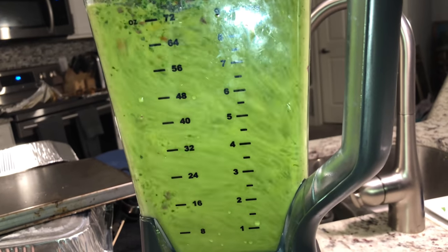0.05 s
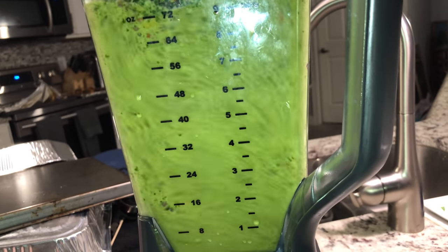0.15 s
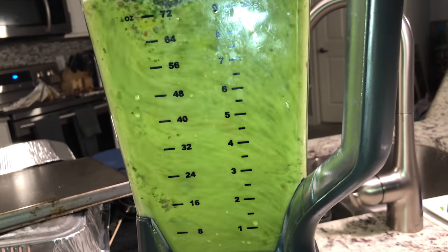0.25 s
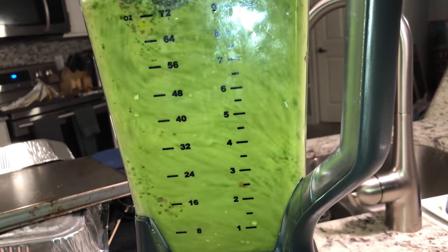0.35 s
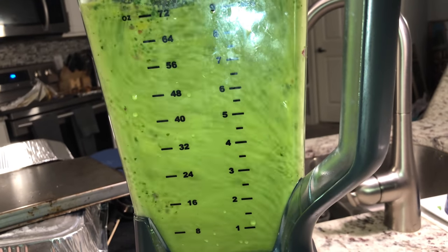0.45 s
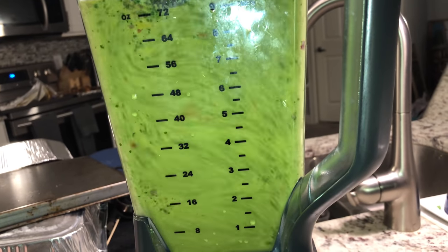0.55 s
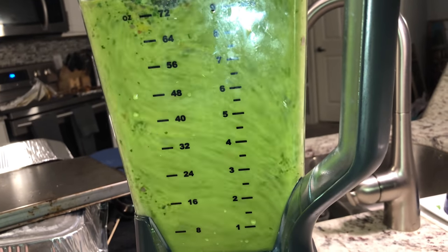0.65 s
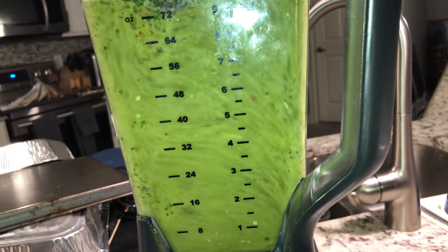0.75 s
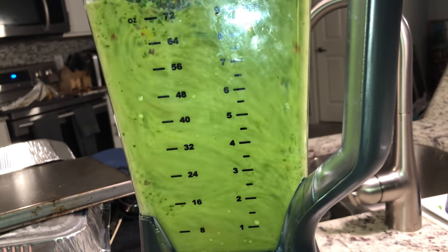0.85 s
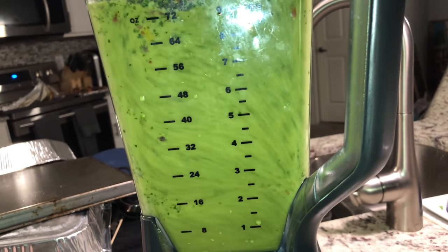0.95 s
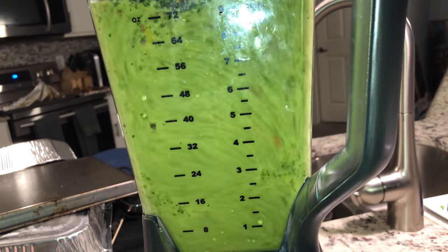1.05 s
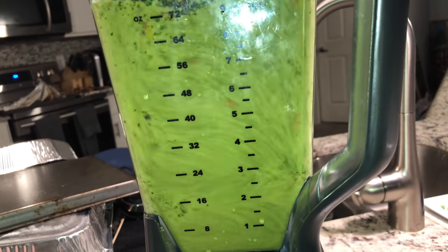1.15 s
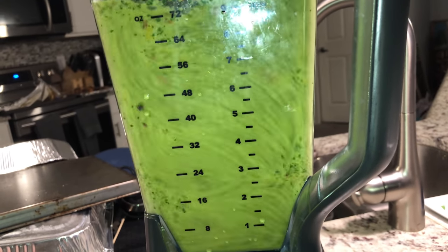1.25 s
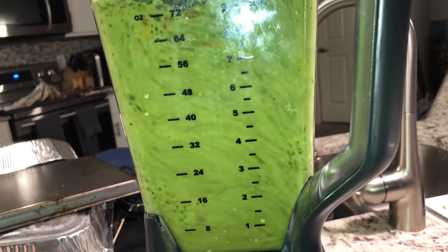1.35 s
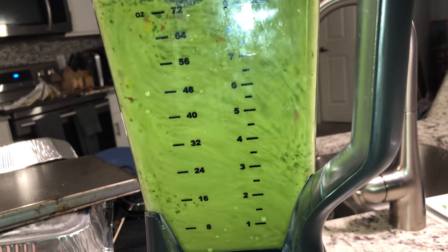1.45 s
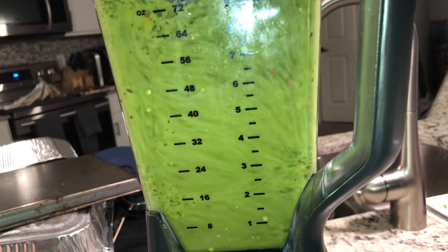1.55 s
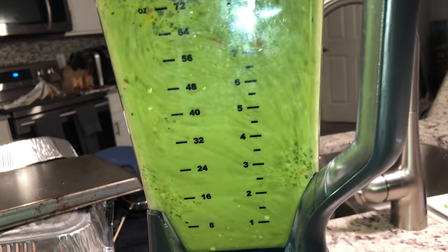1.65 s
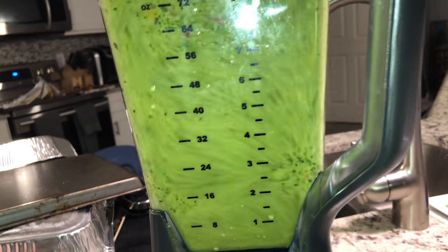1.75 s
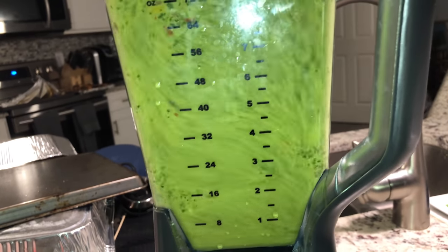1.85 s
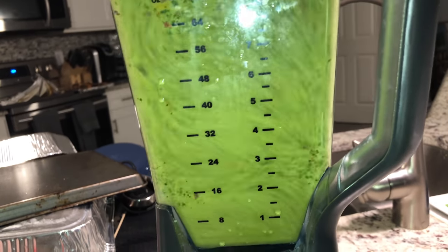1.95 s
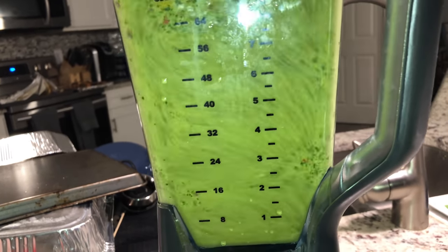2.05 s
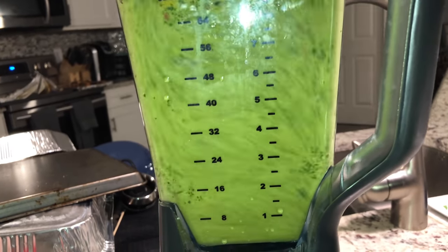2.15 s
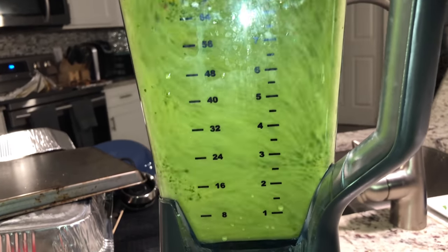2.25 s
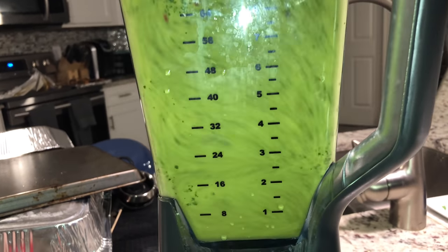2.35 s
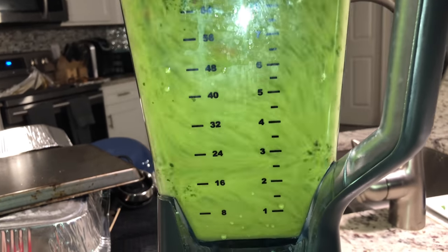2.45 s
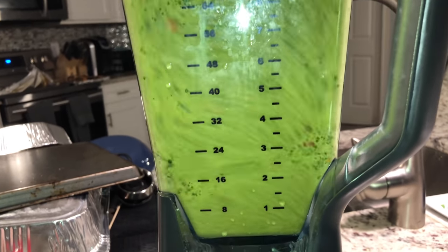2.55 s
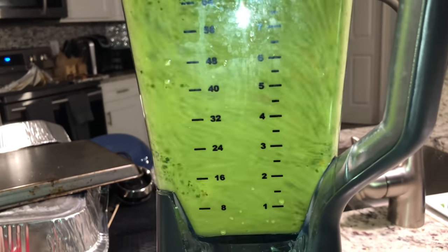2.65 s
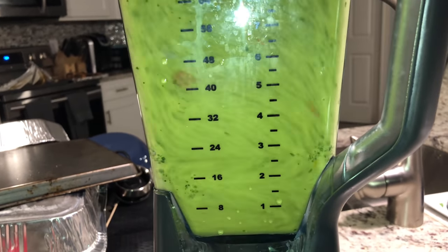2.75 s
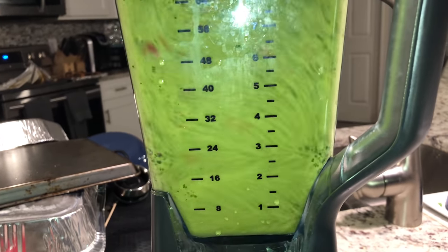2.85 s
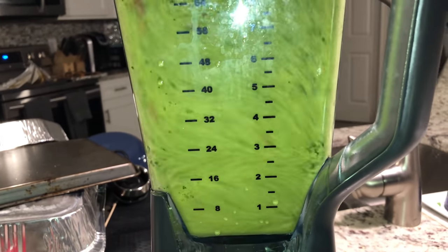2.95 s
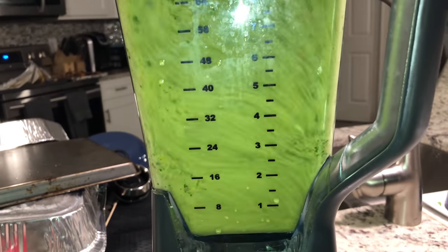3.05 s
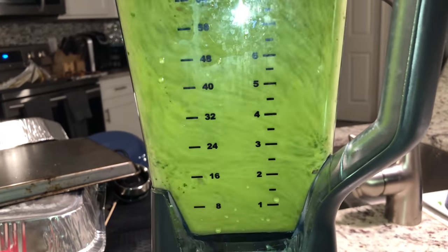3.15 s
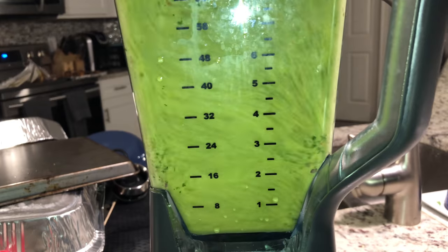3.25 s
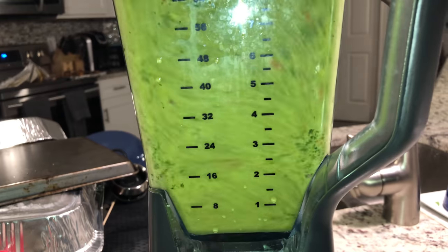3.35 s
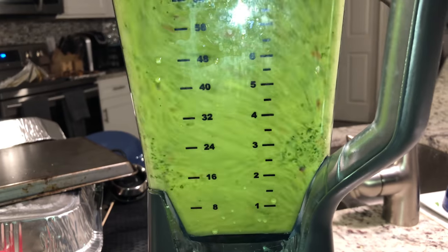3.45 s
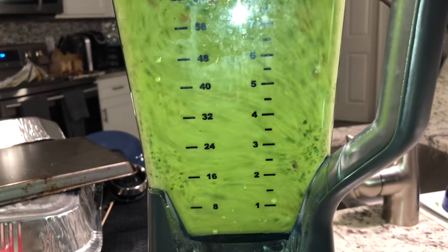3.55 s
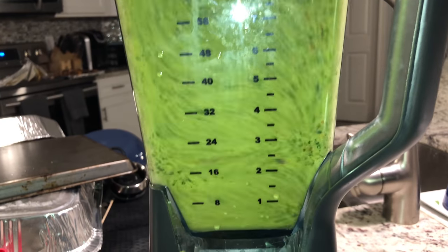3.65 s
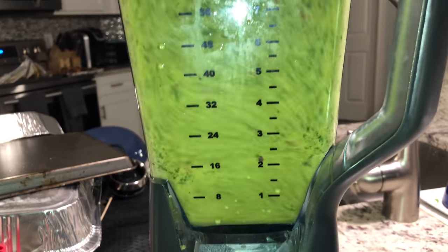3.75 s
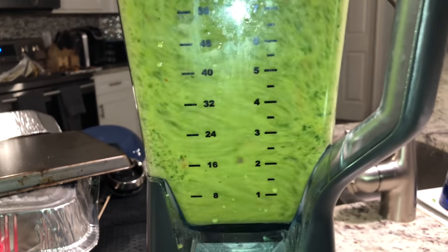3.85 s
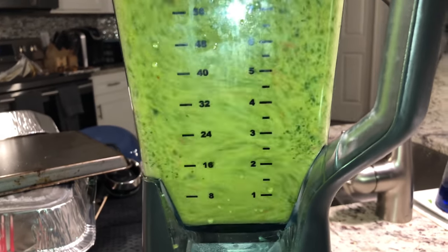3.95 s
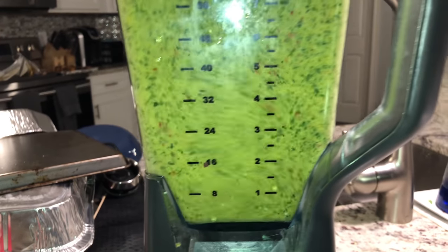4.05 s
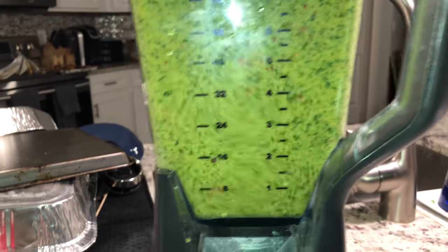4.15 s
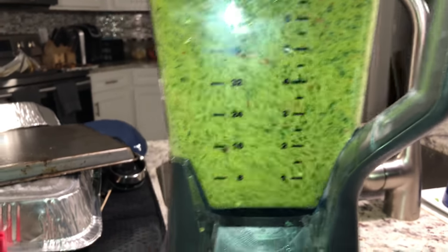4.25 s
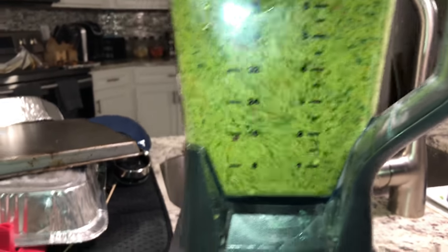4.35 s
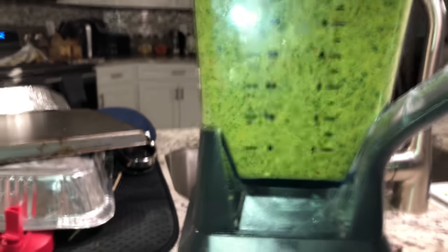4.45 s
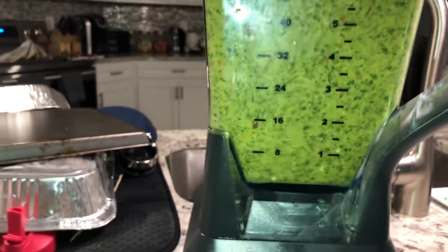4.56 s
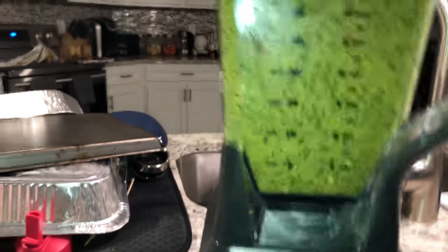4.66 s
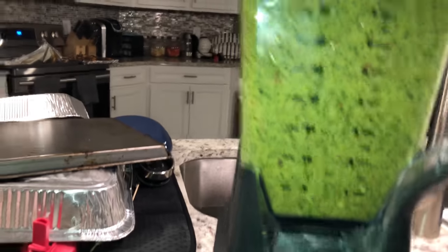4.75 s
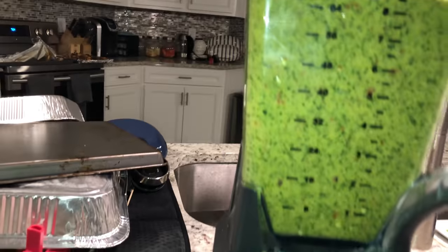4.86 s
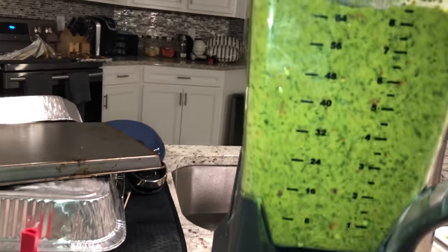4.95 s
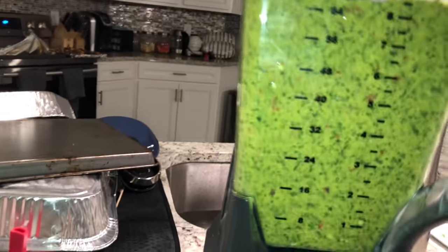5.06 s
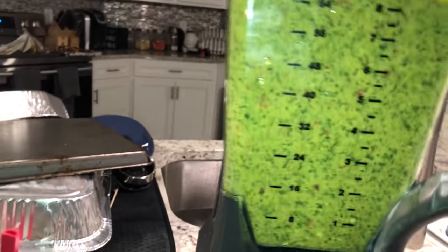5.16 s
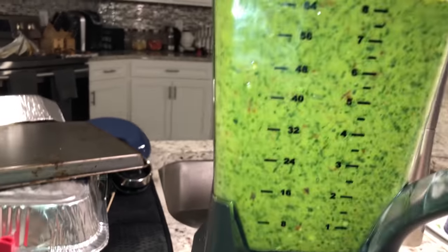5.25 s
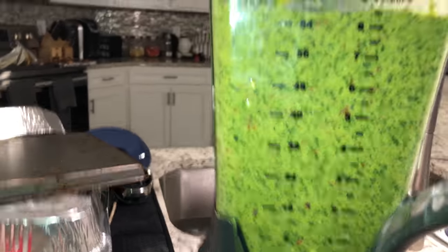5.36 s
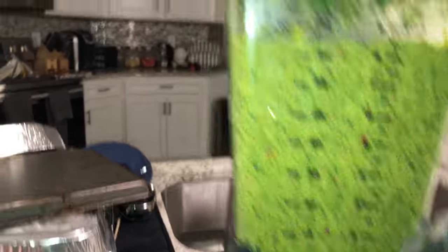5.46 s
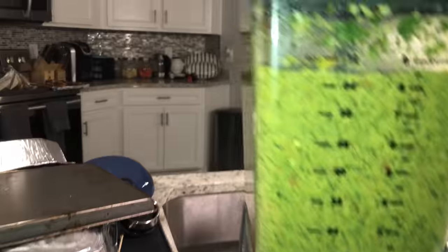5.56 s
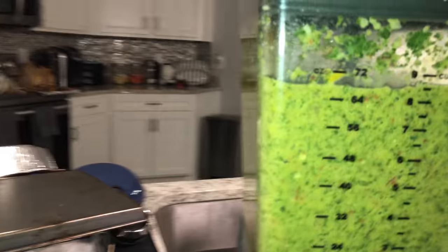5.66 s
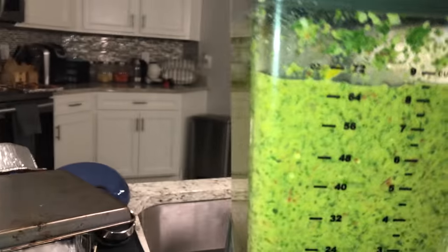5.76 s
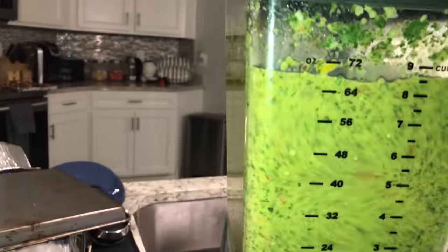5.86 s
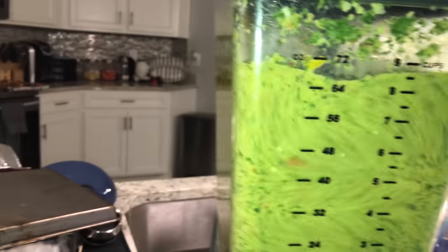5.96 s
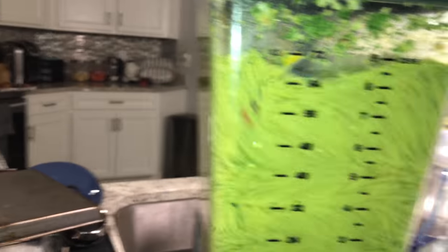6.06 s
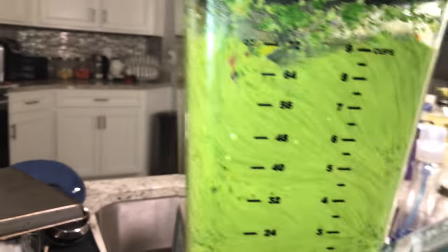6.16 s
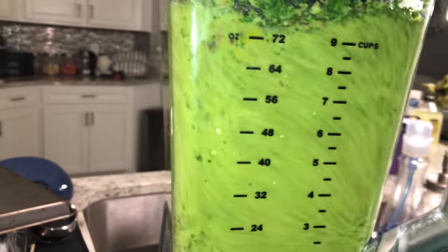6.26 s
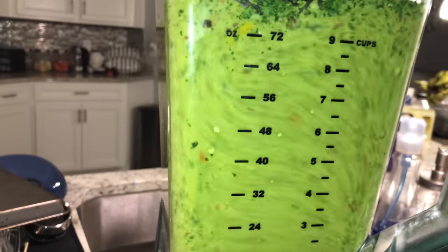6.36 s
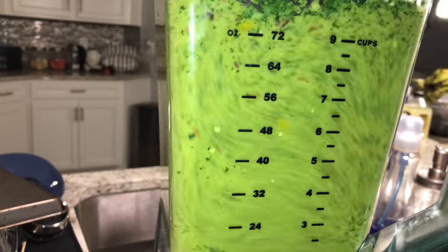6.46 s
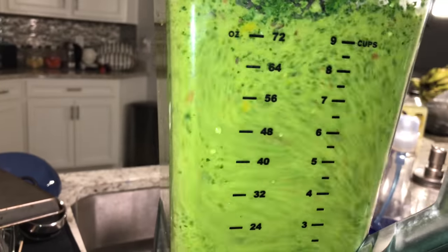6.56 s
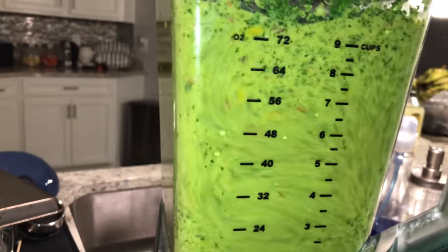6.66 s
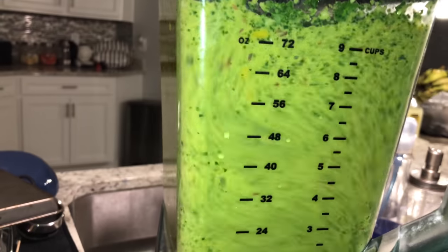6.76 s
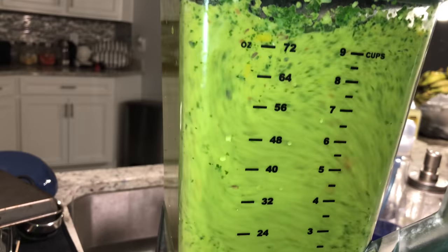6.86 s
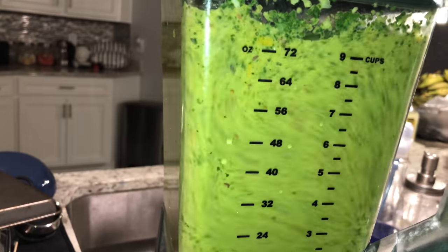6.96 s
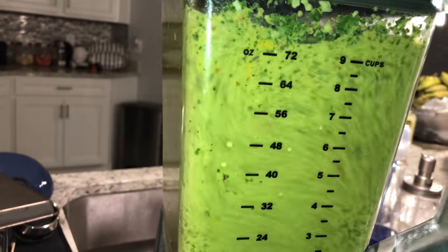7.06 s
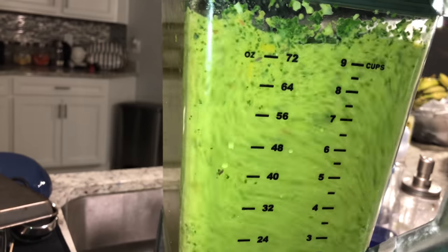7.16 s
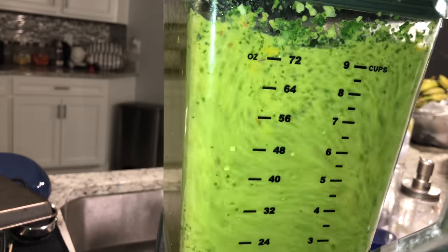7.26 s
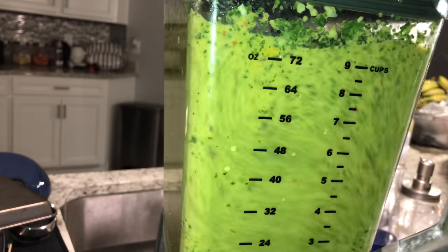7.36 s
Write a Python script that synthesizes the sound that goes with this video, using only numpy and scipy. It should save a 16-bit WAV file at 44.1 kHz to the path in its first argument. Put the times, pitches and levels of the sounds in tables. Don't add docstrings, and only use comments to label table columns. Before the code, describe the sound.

A loud countertop blender churns thick paste, is cut off and coasts down with ticks and knocks, then clicks back on and roars up again.

```python
import sys
import numpy as np
from scipy import signal
from scipy.fft import rfft, irfft, next_fast_len
from scipy.io import wavfile
from scipy.ndimage import uniform_filter1d, map_coordinates

SR = 44100
rng = np.random.default_rng(int(sys.argv[2]) if len(sys.argv) > 2 else 0)


def pcm_store(signal):
    levels = np.round(np.clip(np.atleast_2d(signal), -1, 1) * 32767)
    wavfile.write(sys.argv[1], SR, levels.astype(np.int16).T)


def decibels_to_gain(level_db):
    exponent = np.asarray(level_db, float) / 20
    return 10 ** exponent


N = 326781
T_S = np.arange(N) / SR
GRID_HZ = np.fft.rfftfreq(1024, 1 / SR)
OFF_S, ON_S = 3.3, 5.689
TOP_HZ = 15780
BARS_PER_TURN, TEETH_PER_TURN, ROTOR_PER_TURN = 60.4, 65.0, 6.04


def unit(x):
    return x / np.sqrt(np.mean(x ** 2) + 1e-20)


def along(points, hz):
    f, v = np.transpose(points)
    return np.interp(np.log(hz + 1), np.log(f + 1), v)


def curve(points, s):
    at_s, value = np.transpose(points)
    return np.interp(s, at_s, value)


def bell(x, centre, width):
    return np.exp(-.5 * ((x - centre) / width) ** 2)


def wobble(rate_hz):
    return map_coordinates(rng.standard_normal(int(N * rate_hz / SR) + 4), [T_S * rate_hz])


def coloured(points, count):
    hz = np.fft.rfftfreq(count, 1 / SR)
    return unit(irfft(rfft(rng.standard_normal(count)) * decibels_to_gain(along(points, hz)), count))


# f/Hz, level/dB per Hz
KITCHEN = [(21, -46), (35, -21), (185, 5), (464, -2), (857, -9), (1320, -7), (1580, -8), (2710, -16),
           (6460, -19), (15800, -35)]


def kitchen():
    return decibels_to_gain(-58) * coloured(KITCHEN, count=next_fast_len(N))[:N]


# t/s, f/Hz
SPEED = [(0, 3200), (3.3, 3200), (3.45, 2960), (3.81, 2234), (4.23, 1414), (4.56, 940), (4.8, 660),
         (5.09, 368), (5.45, 20), (5.57, 1), (5.69, 1), (5.75, 1150), (5.85, 2000), (5.95, 2500),
         (6.1, 2810), (6.33, 3094), (6.6, 3245), (7.41, 3305)]


def bar_rate_hz(s):
    return curve(SPEED, s)


def turned():
    swing_s, takes_s = 1.8, 0.1
    return np.clip((T_S - swing_s) / takes_s / 2 + .5, 0, 1)


# t/s, level/dB
SWELL = [(0, 0), (0.35, 0), (0.75, 0.03), (1.8, 0), (2.08, 0.5), (3.2, 0.5), (3.46, -1.5), (3.62, 1),
         (3.85, -2.5), (4.2, -3), (4.6, -2.5), (5.1, 0), (5.36, 7), (5.75, -1.5), (6.15, 0), (6.55, 0.3),
         (7.38, 1), (7.41, -0.5)]
# paste churn, gear grind, casing buzz, fan hiss, unbalance hum, tooth whistle,
# blade orders, bar whine full speed, first run [dB]
FIRST_DB = [-27, -27.5, -30.5, -33.5, -52, -42.5, -42.5, -36]
SECOND_DB = [-25.5, -27, -31.5, -33.5, -59, -33, -41.5, -44]
TURNED_DB = [0.7, 0, -0.7, -1.5, -0.5, 3.5, 1.4, -3]
CUT_DB = [-2, 0, -4, -3, -16, -23, -7, -2]
KNEE_DB = [3.9, 0.33, 3.9, 0.3, 0.3, 0.3, 9.3, 7]
COAST_LAW = [1.2, 1.79, 1.98, 1.3, 1.7, 2.1, 1.8, 2.3]
SPIN_LAW = [0.076, 0.81, 1.2, 1.5, 6, 21, 0.1, 0.73]
STALL_DB = [0, -19, -20, -10.5, -9, -26, -7, -20]
SWELL_SHARE = [0.55, 1.4, 1, 0.9, 2.5, 1, 0.3, 0.3]


def levels_db():
    full_hz, sag_s, bite_s, spin_knee_db = 3300, .07, 0.0051, .7
    slowed_db = 20 * np.log10(full_hz / bar_rate_hz(T_S))
    column = lambda values: np.array(values)[:, None]

    current_lost = 1 - np.exp(-np.maximum(T_S - OFF_S, 0) / sag_s)
    first = column(FIRST_DB) + column(TURNED_DB) * turned() + column(CUT_DB) * current_lost
    first -= column(COAST_LAW) * np.maximum(slowed_db - column(KNEE_DB), 0)
    first[-1] += 8 * bell(slowed_db, 7.5, 4.5)
    first[-2] += 10 * bell(slowed_db, 8, 4)

    spin_loss_db = -column(SPIN_LAW) * np.maximum(slowed_db - spin_knee_db, 0)
    second = column(SECOND_DB) + np.maximum(spin_loss_db, column(STALL_DB))
    second += -9 * np.exp(-np.maximum(T_S - ON_S, 0) / bite_s)
    second[-1] = -37 - .5 * slowed_db + 13 * bell(slowed_db, 2.4, 1.4)
    return np.where(T_S < ON_S, first, second) + column(SWELL_SHARE) * curve(SWELL, T_S)


# f/Hz, level/dB per Hz
BODY = [
    [(20, -58), (40, -52), (80, -15.5), (130, -9), (200, 2.5), (500, -3.5), (1200, -10.5), (2200, -5), (3200, -10.5), (4200, -14), (7000, -13), (11000, -19.5), (15700, -21)],
    [(20, -60), (40, -25), (80, -33), (130, -19.5), (200, -12), (500, -7), (1200, -14), (2200, -5), (3200, -14.5), (4200, -8.5), (7000, -21), (11000, -27.5), (15700, -27)],
    [(20, -60), (40, -47), (80, -18), (130, -15), (200, -0.7), (500, -5), (1200, -10), (2200, -7), (3200, -5.5), (4200, -9.5), (7000, -12.5), (11000, -20), (15700, -22)],
]
# f/Hz, width/Hz, level/dB
RINGS_RUN = [(342, 93, -1.7), (460, 25.4, 6), (550, 26, -3.5), (895, 105, 5), (1468, 28, -7),
             (1606, 220, -4.5), (1580, 72, 1.5), (1975, 82, -4.5), (2260, 24, -10), (2820, 71, 3.5),
             (3260, 140, 0.5), (3510, 260, -2.5), (4840, 260, 2.5), (5440, 18, 9), (6100, 46, -10),
             (6220, 83, 4), (6820, 170, -3), (7360, 120, -7.5), (7700, 61, 4), (9150, 68, 2.5),
             (10420, 130, 4), (11100, 140, 3), (11627, 150, -2.5), (13433, 345, -2.5), (14238, 81, -3),
             (15509, 225, -3.5)]
# f/Hz, width/Hz, level/dB
RINGS_COAST = [(217, 22, 3.5), (365, 28, 4), (636, 190, -6), (850, 29, 6), (1260, 30, 0), (1620, 28, 7),
               (1810, 60, -4), (2170, 69, -1.5), (3490, 77, 3.5), (3850, 160, -4.5), (4300, 84, 0),
               (5570, 93, 5.5), (6000, 96, -0.5), (6778, 61, 6), (7063, 62, -2.2), (7395, 167, 0),
               (8513, 442, 5), (9554, 185, 1.5), (10500, 483, 6), (11032, 59, 1.8), (11627, 200, 1),
               (12183, 510, -1), (12234, 128, 1.4), (13592, 213, -1.6), (14456, 219, 7), (15509, 365, -3)]
# f/Hz, width/Hz, level/dB
RINGS_AGAIN = [(189, 23, 0), (260, 17, 1.5), (480, 15, 5), (580, 69, -4), (1010, 570, 1.5),
               (1448, 34, -4.5), (1810, 180, -1), (2150, 120, 3), (2430, 28, -6), (2800, 170, 2),
               (3130, 53, -8), (3650, 21, -1), (3820, 130, -1.5), (4742, 95, 4), (5730, 170, 6.5),
               (6262, 156, -1.5), (7228, 180, -1.5), (7395, 63, -10), (7770, 106, 4.5), (8800, 289, -0.5),
               (9370, 115, 3), (11032, 123, 0.5), (11778, 201, 0), (12337, 77, 7), (12698, 130, -7),
               (14021, 216, 3.5)]


def body_db():
    places = []
    for broad, rings in zip(BODY, (RINGS_RUN, RINGS_COAST, RINGS_AGAIN)):
        resonances_db = sum(db * bell(GRID_HZ, hz, width_hz) for hz, width_hz, db in rings)
        places.append(along(broad, GRID_HZ) + resonances_db)
    return np.array(places)


# t/s, place index
PLACES = [
    (0, 0),
    (3.55, 0),
    (4.2, 1),
    (5.6, 1),
    (5.68, 2),
    (7.41, 2),
]


def heard_db(body, hz, s):
    place, index = np.broadcast_arrays(curve(PLACES, s), hz / GRID_HZ[1])
    return map_coordinates(body, [place, index], order=1, mode="nearest")


def roar(turns, body, layers_db):
    angle = 2 * np.pi * turns
    throb_db = 0.14 * np.cos(angle) + 0.14 * np.cos(2 * angle) + 0.32 * np.cos(ROTOR_PER_TURN * angle)
    paste_db = 0.086 * wobble(14) + 0.075 * wobble(60) + 0.35 * wobble(400)
    slack = 4.5 - 3.5 * np.clip(np.gradient(turns) * SR / 53, 0, 1)
    noise = decibels_to_gain(slack * (throb_db + paste_db)) * rng.standard_normal(N)
    hz, s, z = signal.stft(noise, SR, nperseg=1024, noverlap=768)
    hz = hz[:, None]
    field = uniform_filter1d(rng.standard_normal(z.shape), size=3, axis=0)
    field = uniform_filter1d(field, size=34, axis=1)
    colour = decibels_to_gain(heard_db(body, hz, s))
    z = z * decibels_to_gain(1.53 * unit(field)) * colour

    above = lambda edge_hz: 1 / (1 + (edge_hz / (hz + 1)) ** 8)
    mesh_hz = bar_rate_hz(s) * TEETH_PER_TURN / BARS_PER_TURN
    below_mesh = 1 - above(.88 * mesh_hz + 250)
    churn = 1 - above(1300)
    grind = above(1300) * (1 - above(3300)) * (np.where(s < ON_S, .22, .06) + below_mesh)
    buzz = above(3300) * (1 - above(7000))
    hiss = above(7000)
    out = 0
    for share, db in zip((churn, grind, buzz, hiss), layers_db):
        part = z * np.sqrt(share / np.sum(share * colour ** 2, 0))
        out = out + decibels_to_gain(db) * unit(signal.istft(part, SR, nperseg=1024, noverlap=768)[1][:N])
    return out


# shaft multiple, level/dB
BLADE = [(2, -7), (3, -4), (4, 1), (5, 2), (6, -2), (7, -1), (8, -6), (9, -3), (10, -1), (12, -7)]
# bar-rate multiple, level/dB
WHINE = [(2, -10), (3, -7), (4, 1), (5, -2), (6, -2), (7, -1), (8, 0), (9, -2), (10, -1), (11, -2),
         (12, -4), (13, -5), (14, -6), (20, -9)]


def tones(turns, body, layers_db):
    feet_hz, feet_width_hz, feet_db = 145, 28, 11
    hum_db, tooth_db, blade_db, whine_db = layers_db
    bars_hz = bar_rate_hz(T_S)
    heard = lambda hz: np.interp(T_S, T_S[::64], heard_db(body, hz[::64], T_S[::64]))
    slow = lambda rate_hz: np.interp(T_S, np.arange(400) / rate_hz, rng.standard_normal(400))

    def sine(k, rough_rad, rate_hz):
        return np.sqrt(2) * np.sin(2 * np.pi * k * turns + rough_rad * slow(rate_hz))

    out = decibels_to_gain(hum_db + 1.6 * slow(7)) * sine(1, .45, 9)
    out += decibels_to_gain(tooth_db + 0.38 * slow(25)) * sine(TEETH_PER_TURN, 0.67, 30)
    for k, db in BLADE:
        hz = k * bars_hz / BARS_PER_TURN
        lit_db = heard(hz) + feet_db * bell(hz, feet_hz, feet_width_hz)
        out += decibels_to_gain(blade_db + db + lit_db + 2.5 * slow(8)) * sine(k, .5, 9)
    for k, db in WHINE:
        hz = k * bars_hz
        lit_db = 1.15 * heard(hz) - 60 * (hz > TOP_HZ) - 6 * (hz > 11800)
        lit_db -= 12 * np.clip(1 - (hz - 2600) / 1400, 0, 1)
        out += decibels_to_gain(whine_db + db + lit_db + 3.2 * slow(22)) * sine(k * BARS_PER_TURN, .9, 50)
    return out


# shaft multiple, level/dB over the grind
MESH = [(46, -12), (48, -16.5), (50, -5.5), (52, -12)]


def mesh(turns, grind_db):
    base_db, shake_rad = grind_db - 5 * (1 - turned()), 1.6 * wobble(45)
    out = 0
    for k, db in MESH:
        out = out + decibels_to_gain(base_db + db + 2.9 * wobble(30)) * np.sin(2 * np.pi * k * turns + shake_rad)
    return out


def strikes(rows):
    out, t = np.zeros(N + SR), np.arange(SR // 20) / SR
    hz = np.fft.rfftfreq(len(t), 1 / SR)

    def burst(centre_hz, width):
        puff = rfft(rng.standard_normal(len(t)))
        return unit(irfft(puff / (1 + (np.log((hz + 1) / centre_hz) / width) ** 4), len(t)))

    for s, db, centre_hz, thud_db in rows:
        tick = burst(centre_hz, 0.28) * decibels_to_gain(-60 * t / 0.017)
        thud = burst(900, 0.95) * decibels_to_gain(thud_db - 6.5 - 60 * t / 0.043)
        rise = 1 - np.exp(-t / 0.00089)
        out[round(s * SR):][:len(t)] += decibels_to_gain(db - 3.5) * rise * (tick + thud)
    return out[:N]


# t/s, peak level/dB, centre f/Hz, thud level/dB
TICKS = [
    (4.0594, -38, 10000, 2.5),
    (4.169, -37, 8210, 5),
    (4.208, -29, 8600, 13),
    (4.249, -28, 7750, 4),
    (4.2894, -39, 14500, 5),
    (5.032, -37, 14900, -6),
    (5.0454, -51, 8770, 6),
    (5.1103, -36, 7500, 6),
]


def brush_ticks():
    return strikes(TICKS)


# t/s, peak level/dB, centre f/Hz, thud level/dB
KNOCKS = [(4.3321, -23, 4920, 3), (4.4394, -31, 4240, -10), (4.4887, -26, 5120, 4),
          (4.5514, -28, 4480, 11.5), (4.6155, -33, 4610, 13), (4.6994, -41, 2980, 0),
          (4.7894, -40, 4100, 11), (4.8694, -41, 4620, -7), (4.9686, -32, 4240, 6), (5.345, -37.5, 3050, 7),
          (5.69, -24, 3290, 6), (5.6999, -21, 3330, -4), (5.7174, -24, 3400, -6)]


def coupling_knocks():
    return strikes(KNOCKS)


def scrape():
    at_s, half_s, db, hz = 5.24, .04, -62, 8000
    band = [(.6 * hz, -40), (.85 * hz, -3), (hz, 0), (1.2 * hz, -4), (1.5 * hz, -40)]
    return decibels_to_gain(db) * bell(T_S, at_s, half_s) * coloured(band, count=next_fast_len(N))[:N]


def squeak():
    at_s, half_s, db, hz, glide_hz_per_s = 5.243, .04, -64.5, 5150, -10500
    t = T_S - at_s
    swell = np.exp(-.5 * (t / half_s) ** 4)
    return decibels_to_gain(db + 4.5 * wobble(55)) * swell * np.sin(2 * np.pi * (hz * t + glide_hz_per_s * t * t / 2))


# t/s, level/dB, rise/s, snap t60/s, panel level/dB
SWITCH = [
    (5.5874, -27, 0.0017, 0.021, 1.5),
    (5.628, -41, 0.0091, 0.041, -12),
]
# f/Hz, level/dB, t60/s
PLASTIC = [(815, -8, 0.056), (1120, -1, 0.032), (1860, -10, 0.013), (2300, -3, 0.02), (4600, -2, .01),
           (5900, -6, .012)]
# f/Hz, level/dB per Hz
SNAP = [(300, -14), (900, 1.5), (1900, -3), (3000, -8), (6500, -9.5), (9000, -25), (16000, -18)]


def switch():
    out, t = np.zeros(N + SR), np.arange(SR // 8) / SR
    for s, db, rise_s, snap_t60_s, panel_db in SWITCH:
        ring = 0
        for hz, level_db, t60_s in PLASTIC:
            phase = 2 * np.pi * rng.random()
            ring = ring + decibels_to_gain(level_db - 60 * t / t60_s) * np.sin(2 * np.pi * hz * t + phase)
        snap = decibels_to_gain(-60 * np.maximum(t - rise_s, 0) / snap_t60_s) * coloured(SNAP, count=len(t))
        rise = np.clip(t / rise_s, 0, 1) ** 2
        out[round(s * SR):][:len(t)] += decibels_to_gain(db) * (decibels_to_gain(panel_db) * ring + snap) * rise
    return out[:N]


def lurch():
    db, hz, t60_s, rise_s = -27, 120, .11, .006
    t = np.maximum(T_S - ON_S, 0)
    return decibels_to_gain(db - 60 * t / t60_s) * np.sin(2 * np.pi * hz * t) * (1 - np.exp(-t / rise_s))


# f/Hz, t60/s
WALLS = [(200, 0.38), (2000, 0.39), (10000, 0.11)]


def walls(x):
    hz, t, z = signal.stft(rng.standard_normal(SR // 2), SR, nperseg=256)
    tail = signal.istft(z * decibels_to_gain(-60 * t / along(WALLS, hz)[:, None]), SR, nperseg=256)[1]
    return signal.fftconvolve(np.pad(x, (200, 0)), tail / np.linalg.norm(tail))[:N]


def scene():
    turns = np.cumsum(bar_rate_hz(T_S)) / BARS_PER_TURN / SR
    body, layers_db = body_db(), levels_db()
    motor = roar(turns, body, layers_db[:4]) + tones(turns, body, layers_db[4:])
    motor = motor + mesh(turns, layers_db[1])
    hits = brush_ticks() + coupling_knocks() + switch()
    mono = kitchen() + motor + scrape() + squeak() + lurch() + hits + decibels_to_gain(-19) * walls(hits)
    return np.array([mono, mono])


def band_limit(x):
    return signal.sosfilt(signal.butter(12, 15970, fs=SR, output="sos"), x)


def record(dry):
    m = next_fast_len(N)
    passed = np.fft.rfftfreq(m, 1 / SR) < TOP_HZ
    mix = irfft(rfft(dry, m) * passed, m)[:, :N]
    return band_limit(mix)


dry = scene()
out = record(dry)
pcm_store(out)
```